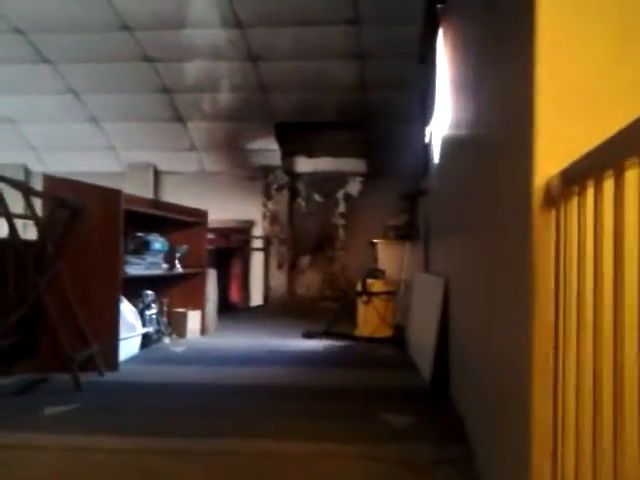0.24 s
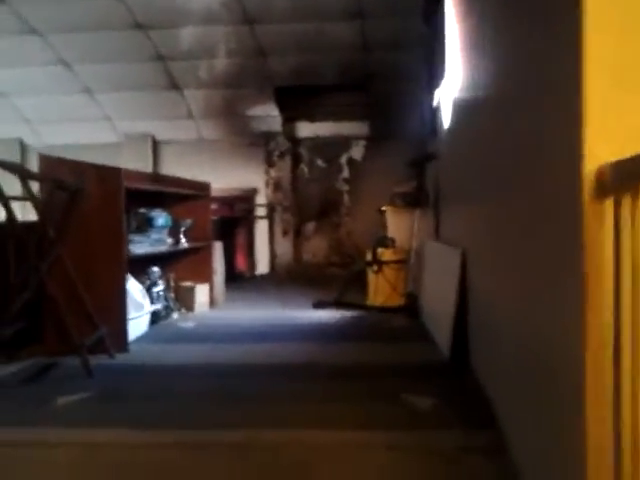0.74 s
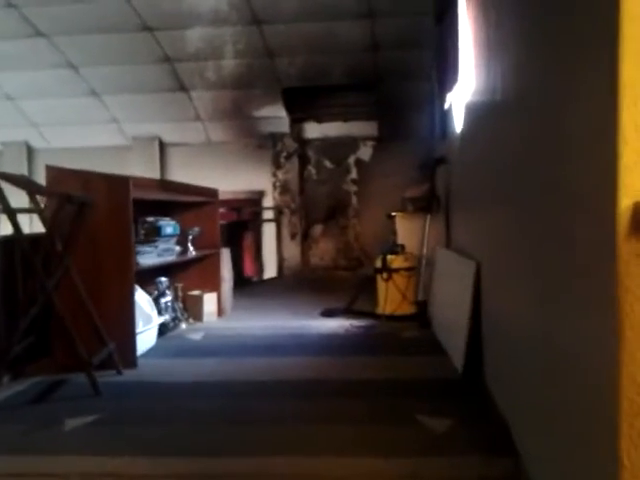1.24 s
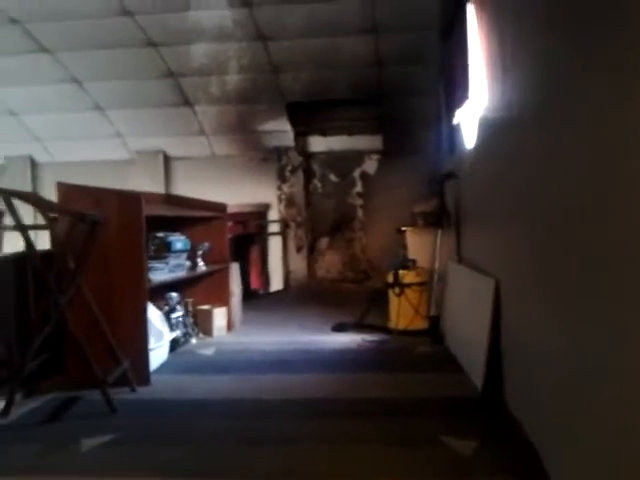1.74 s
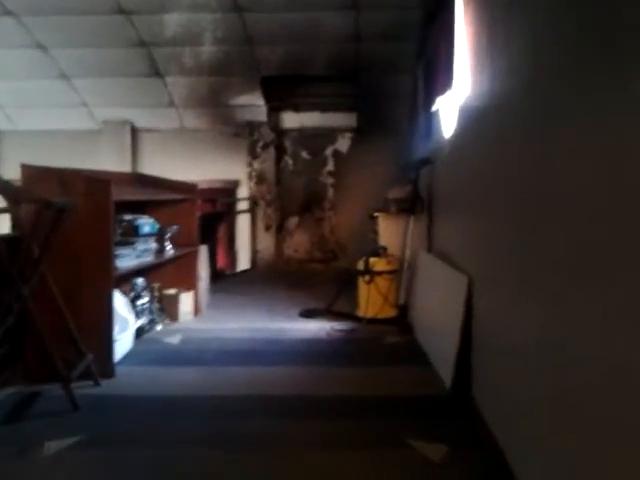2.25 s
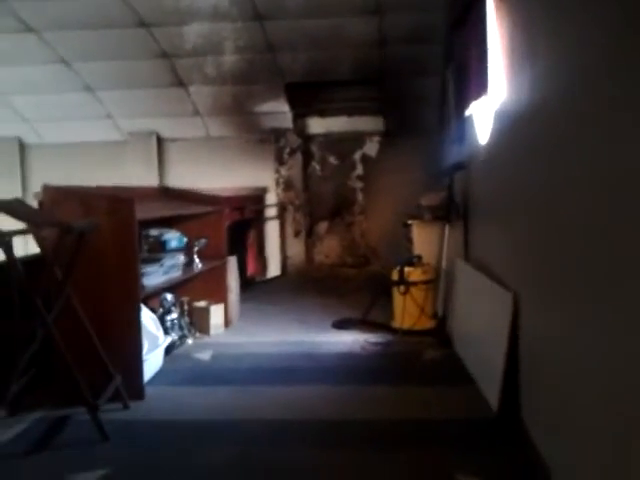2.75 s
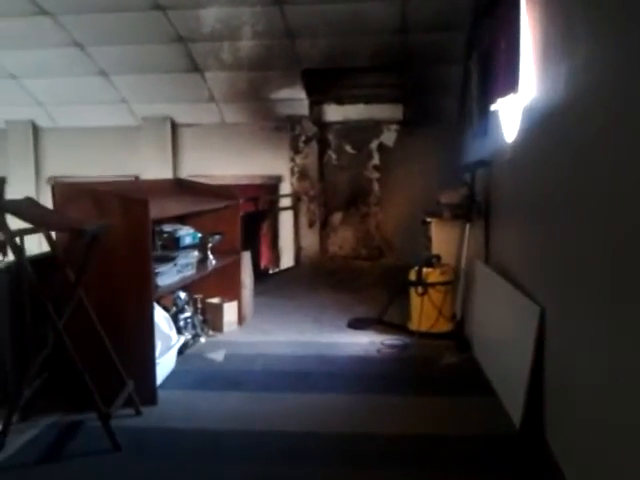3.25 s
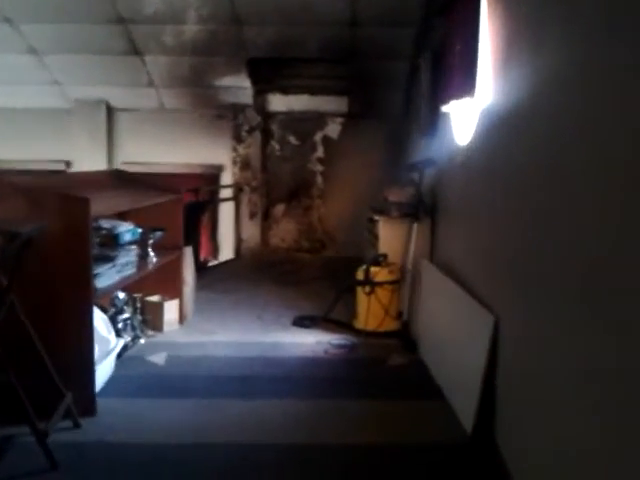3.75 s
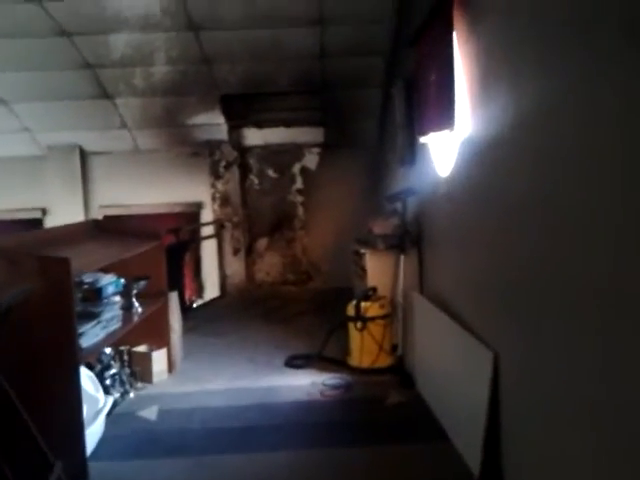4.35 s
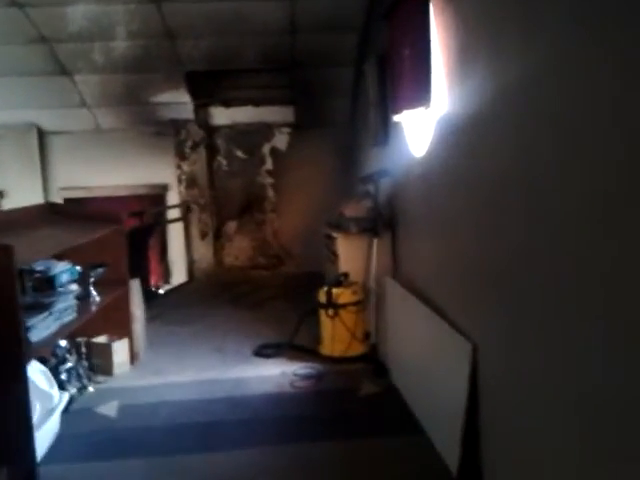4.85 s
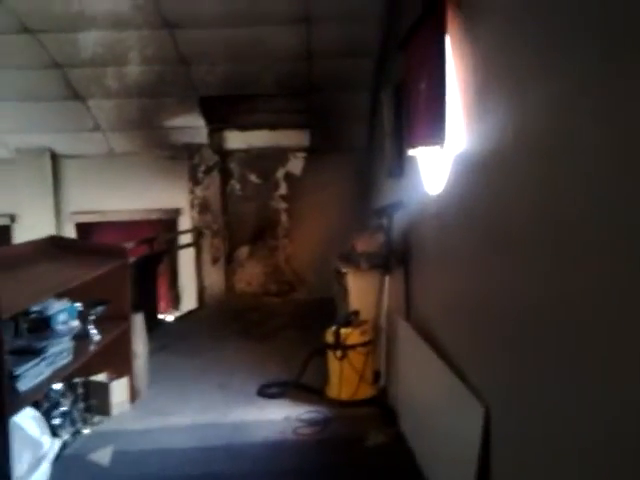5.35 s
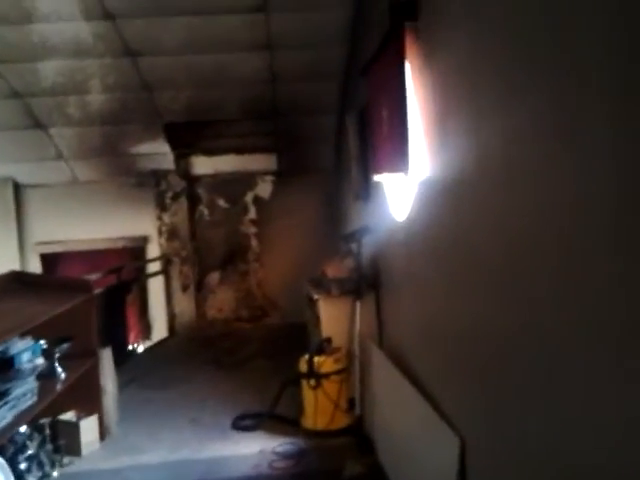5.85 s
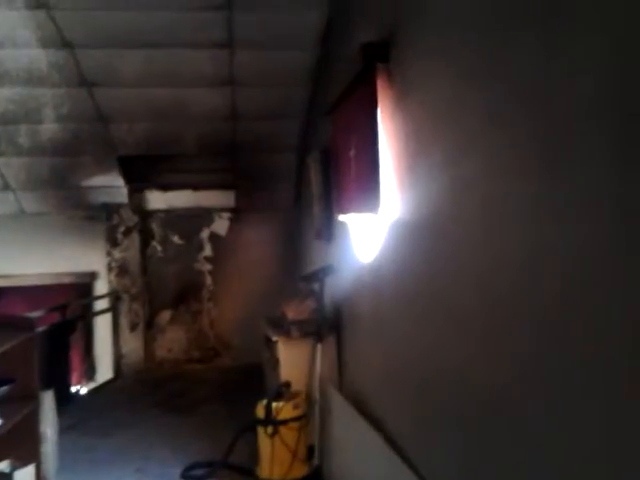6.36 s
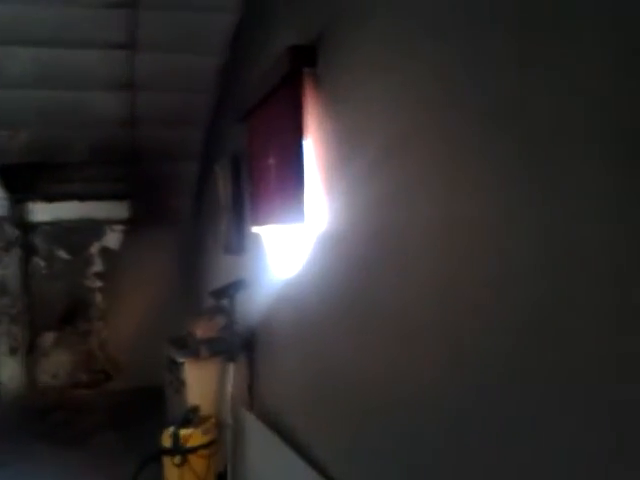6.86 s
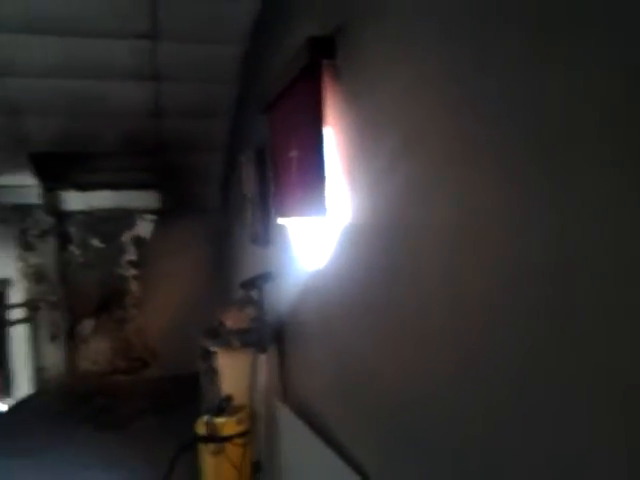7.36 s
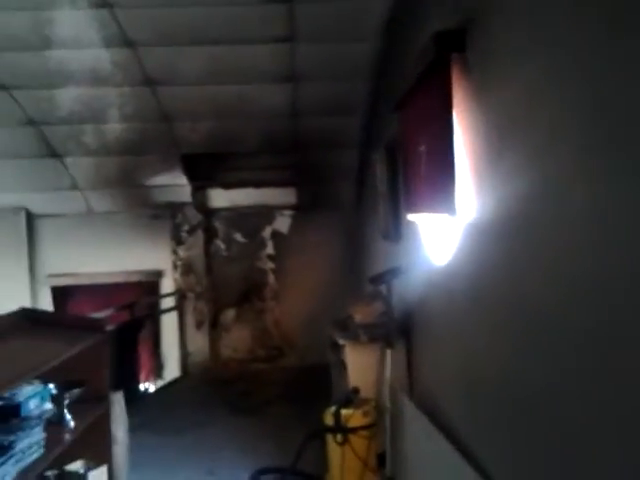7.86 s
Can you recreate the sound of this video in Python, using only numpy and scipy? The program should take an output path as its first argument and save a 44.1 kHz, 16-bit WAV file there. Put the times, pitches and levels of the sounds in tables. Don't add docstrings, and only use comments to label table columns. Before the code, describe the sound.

Close, bass-light hand-held pickup of a person walking slowly through an echoing, fire-damaged interior. Six spaced heavy steps thud on loose boards, with lighter knocks, crunching grit and dusty sprays between them. A small metallic rattle follows the second step and boards creak very faintly. A barely audible motor hums before the final, strongest step; afterwards only ringing decay, hiss, tiny irregular ticks and a few clicks remain.

```python
import sys
import numpy as np
from scipy import signal
from scipy.fft import rfft, irfft
from scipy.io import wavfile
from scipy.ndimage import uniform_filter1d

SR = 44100
rng = np.random.default_rng(int(sys.argv[2]) if len(sys.argv) > 2 else 0)


def generate_wav(signal):
    frames = np.transpose(np.atleast_2d(signal))
    scaled = np.clip(frames, -1, 1) * 32767
    pcm = np.round(scaled).astype(np.int16)
    wavfile.write(sys.argv[1], SR, pcm)


def volts_from_db(level):
    exponent = np.asarray(level, float) / 20
    return 10 ** exponent


N = 357634

# start_s, level_db, sharpness_db, weight_db, brightness_db
BLOWS = [(0.331, -31.5, 21, 3.5, -1.5), (0.585, -47, 27.5, -12, 15), (1.535, -38.5, 0, -3.5, -23.5),
         (2.469, -32, 15, 0.5, -12), (2.488, -40, 17, 0, -2), (2.703, -44.5, 23, -12, 10),
         (2.746, -38.5, 15, -19, -22), (3.431, -29.5, 15.5, -3, -9.5), (3.461, -32, 3, -9.5, -13),
         (3.505, -35, 15.5, -4, -10.5), (3.71, -46, 5, -15, -12), (3.826, -38.5, 15, -5, 4.5),
         (3.855, -35.5, 19.5, -5, 5.5), (3.874, -33.5, 20, -26, 8), (4.394, -27.5, 15, -4, 5.5),
         (4.413, -21.5, 17, 1, 1.5), (4.99, -49, 20, -3, 15), (5.6667, -16, 15, 2, -15),
         (5.691, -17, 15, -3, -14)]
# start_s, level_db, sharpness_db, weight_db, brightness_db
RAPS = [
    (0.285, -22.5, -1, -9, -22.5),
    (0.612, -43.5, 17, -13, -1),
    (1.844, -45, -5, -21, 1.5),
    (4.975, -47, 24, -19.5, 8),
    (5.627, -30.5, -3.5, 0, -8),
]
SNAP_SHARE, SOLID_SNAP_DB, HOLLOW_SNAP_DB = 0.46, -2, -12.5
# low_hz, high_hz
BANDS = [
    (250, 900),
    (900, 3200),
    (3200, 6500),
    (6500, 15000),
]
# pitch_hz, level_db per Hz
MIC = [(100, -60), (230, -32.5), (330, -5), (430, -11.5), (700, -4.5), (1500, -8), (2200, -4.5),
       (3400, -14.5), (5000, -18), (7000, -13), (8500, -4), (10000, -14), (12500, -26), (15800, -30)]
# pitch_hz, t60_s
ROOM = [(150, 0.95), (400, 1), (1000, 0.96), (2700, 0.84), (5000, 0.64), (8500, 0.6), (14000, 0.19)]
# pitch_hz, fill_s
BUILD = [(200, 0.056), (700, 0.035), (2500, 0.012), (9000, 0.0083)]

# start_s, level_db, t60_s, swell_s
HEELS = [
    (.33, -34, 0.83, 0.011),
    (1.533, -47, 0.92, 0.0077),
    (2.47, -39.5, 0.74, 0.0038),
    (3.435, -37.5, 0.73, 0.028),
    (4.41, -26.5, 0.84, 0.053),
    (5.67, -21.5, 0.81, 0.0061),
]
# start_s, level_db, t60_s, swell_s
TOES = [
    (.286, -33, 0.69, 0.007),
    (5.626, -45, 0.37, .004),
]
# pitch_hz, width_hz, level_db
PANEL_A = [(340, 10, -7), (447, 27, -4), (624, 30, 1), (660, 20, -2), (872, 30, -7), (1217, 30, -5),
           (1572, 57, -9), (1787, 20, -9), (1915, 39, -9)]
PANEL_B = [(334, 21, -9), (483, 12, 0), (712, 20, -8), (760, 10, -9), (834, 58, -5), (1298, 30, -5),
           (1500, 29, -9)]
PANEL_C = [(322, 3, -1), (458, 41, -2), (576, 20, -7), (716, 30, 0), (834, 20, -6), (985, 40, -6),
           (1437, 50, -6), (1720, 56, -5), (2040, 41, -6)]
PANEL_D = [(428, 15, -3), (568, 10, -1), (616, 15, -2), (958, 36, -6), (1111, 40, -5), (1396, 40, -7),
           (1563, 20, -7), (1725, 29, -8), (2080, 60, -4)]
PANEL_E = [(420, 6, -2), (469, 8, -4), (575, 28, -3), (727, 20, -3), (792, 20, -3), (950, 59, -3),
           (1012, 20, -5), (1160, 26, -4), (1583, 60, -7), (1830, 42, -8), (2056, 32, -6)]
PANEL_F = [(268, 8, -11), (420, 6, 0), (451, 10, -4), (494, 10, -3), (592, 12, -2), (836, 20, -5),
           (942, 15, -5), (1100, 6, -9), (1850, 49, -9), (2062, 50, -6), (2116, 30, -7), (2342, 30, -6),
           (2560, 60, -8), (2750, 36, -10)]
# pitch_hz, width_hz, level_db
PANEL_TOE = [(460, 20, -9), (775, 30, -8), (969, 15, -5), (1464, 40, -12), (1782, 15, 0), (2213, 30, -3),
             (2676, 40, -10), (2821, 40, -12)]
SPLIT_HZ, SIDE_SHARE = 3, .28
# start_s, level_db, pitch_hz, t60_s
JOISTS = [(.335, -40, 207.5, .6), (.34, -47, 262, .7), (.345, -34, 635, .5), (.7, -70, 215, 2.5),
          (1.54, -59, 230, .55), (2.47, -49, 201, .43), (2.47, -62, 146.5, .68), (2.5, -46, 322, .7),
          (3.44, -55, 196.6, .9), (3.485, -36, 600, .8), (3.86, -54, 382, 1.1), (4.48, -56, 159.5, 1.4),
          (4.5, -38, 420, .8), (4.64, -64, 12020, 1.2), (5.67, -49, 135, .61), (5.68, -28, 592, .45),
          (5.69, -45, 197.5, .9), (5.71, -28, 1100, .7), (5.75, -35, 835, .45), (5.79, -36, 497, .7),
          (5.9, -61, 267, 3.5), (6.19, -54, 497, .5), (6.3, -61, 330, 1.4), (6.5, -62, 195, 1.5),
          (7.04, -68, 358, 2.1)]

# start_s,
# length_s, low_db, high_db
SCUFFS = [(0, .1, -57, -66), (1.2, 0.2, -61.5, -60.5), (1.41, 0.38, -64.5, -78), (1.7, 0.064, -56, -62),
          (1.85, 0.047, -65, -58), (2.16, 0.18, -91, -60.5), (2.32, 0.075, -83, -55.5),
          (2.71, 0.055, -71, -42.5), (2.76, 0.065, -58, -53), (2.98, 0.059, -58, -54),
          (3.86, 0.16, -52.5, -45.5), (6.35, 0.13, -62, -57), (7.19, 0.082, -69, -59.5),
          (7.04, 0.035, -63, -79), (6.55, 0.42, -66, -80)]
# start_s, level_db, pitch_hz, ring_cycles
PIPS = [(.586, -24, 6000, 8.7), (.586, -33, 2250, 4.5), (.613, -29, 8800, 12), (.337, -24, 1150, 5),
        (.338, -23, 2350, 9), (3.511, -29, 2600, 9), (3.535, -28, 1500, 2.5), (3.737, -41, 1900, 3.5),
        (1.844, -39, 1900, 5), (1.854, -38, 8500, 14), (1.859, -38, 9100, 44), (1.953, -41, 7000, 4.5),
        (2.168, -52, 6370, 37), (2.704, -30, 2100, 5.5), (2.747, -28, 1850, 7), (2.777, -36, 2400, 3.5),
        (2.473, -26, 1700, 5), (2.49, -25, 2000, 4), (2.48, -29, 1550, 14), (4.399, -22, 7000, 6),
        (4.419, -17, 2300, 5), (3.4318, -22, 8200, 10), (3.826, -29, 5500, 9), (3.8555, -22, 8800, 9),
        (3.8555, -27, 3000, 4), (3.8742, -19, 8300, 8), (3.8742, -26, 2200, 3), (4.836, -44, 7200, 36),
        (4.975, -37, 2500, 5), (4.975, -36, 5400, 7), (5.638, -37, 4900, 18), (5.6465, -42, 4900, 17),
        (5.667, -11, 2400, 5), (6.752, -48, 1560, 2.7), (7.636, -45, 8500, 14.8), (7.723, -49, 7500, 4),
        (7.083, -52, 8600, 14)]
# start_s, level_db, length_s
DUST = [(.592, -32, .029), (1.912, -42, .025), (2.003, -41, .017), (2.712, -44, .04), (3.775, -52, .016),
        (4.396, -25, .085), (4.98, -52, .035), (5.668, -35, .1)]
# start_s, level_db
JINGLES = [(1.903, -45), (1.913, -38), (1.93, -46), (1.951, -52), (2.001, -42), (3.7615, -53),
           (3.7748, -42), (3.7944, -49)]
# pitch_hz, width_hz, level_db
METAL = [(6130, 250, -7.5), (7460, 160, -8), (8500, 184, 1), (8900, 104, 1), (10700, 80, 0),
         (12000, 100, -21), (13300, 80, -12), (14400, 120, -20)]
# start_s, length_s, level_db, pitch_hz
CREAKS = [
    (1.415, 0.13, -58.5, 2280),
    (2.985, .06, -62, 2170),
    (6.6, 0.306, -72.5, 2220),
]

# start_s, level_db
CLICKS = [(7.153, -48), (7.553, -51.5), (7.723, -49), (6.904, -53), (6.254, -37)]
TICKS = [.19, .804, .953, 1.243, 1.343, 1.663, 1.793, 2.129, 2.613, 3.223, 3.283, 3.343, 3.643, 4.113,
         4.243, 4.643, 4.863, 5.093, 5.273, 5.393, 5.493, 5.923, 6.043, 6.163, 6.253, 6.663, 6.903, 7.153,
         7.553, 7.723]
SOFT_TICKS = [1.058, 1.385, 2.303, 2.363, 2.619, 2.659, 4.31, 4.687, 4.945, 5.1, 5.139, 5.292, 5.352, 5.463,
              5.525, 5.586, 6.39, 6.42, 6.818, 7.012, 7.035, 7.338, 7.51, 7.848]
CLOCK_S, CLOCK_START_S, FAINT_CHANCE = .01, .0033, .09
TICK_DB, TICK_SPREAD_DB, SOFT_TICK_DB, FAINT_TICK_DB = -44.5, 1.3, -48, -52
# pitch_hz, level_db
TICK_COLOUR = [(500, -26.5), (5000, -24), (11000, -7.0), (15500, -4.0), (17000, -50.0)]

# start_s, pitch_hz, level_db
HUM = [
    (4.55, 199, -54),
    (4.63, 205, -56.5),
    (5.06, 207.7, -66.5),
    (5.45, 210, -71),
    (5.6, 203, -77),
]
# pitch_hz, level_db per Hz
HISS = [(30, -23), (100, -7.5), (300, 2.5), (1000, -14.5), (2500, -10.5), (5000, -11.5), (7200, -10),
        (8600, -2.5), (10000, -9), (12500, -8.5), (15800, -7)]
# start_s, level_db
HISS_DB = [
    (0, -59.5),
    (4.3, -59.5),
    (5.6, -60.5),
    (6.2, -62),
    (8.11, -63),
]
# pitch_hz, level_db per Hz
STIR = [(150, -14.5), (400, -5.5), (1200, -5.0), (2200, -5.5), (3500, -13.0), (6500, -12.0),
        (8500, 1.0), (10200, -10.5), (16000, -24)]
STIR_DB, STIR_LATE_DB, STIR_UNDER_HEEL_DB, STIR_T60_S, STIR_SWELL_S = -58, -64.5, -36.5, 2.2, 0.089
# pitch_hz, level_db per Hz
RUMBLE = [(30, -22), (60, -18.0), (100, -3.0), (200, -9.0), (500, -32.0), (2000, -63.0)]
RUMBLE_DB, RUMBLE_UNDER_HEEL_DB, RUMBLE_T60_S, RUMBLE_SWELL_S = -88, -40.5, .9, .02
# centre_s, width_s, level_db
GUSTS = [(2.14, 0.34, -90), (3.389, 0.063, -72), (4.4, 0.18, -68), (6.8, 0.35, -73.5), (7.152, 0.16, -73),
         (7.58, 0.3, -69.5)]
SETTLE_S, SETTLE_WIDTH_S = 5.85, .15
LATE_DULL_DB, DULL_HZ = -6, 6000


def evened(x):
    return x / np.sqrt(np.mean(x ** 2) + 1e-20)


def read(points, hz):
    f, value = np.transpose(points)
    return np.interp(np.log(hz + 1), np.log(f + 1), value)


def add(mix, s, sound):
    part = mix[round(s * SR):][:len(sound)]
    part += sound[:len(part)]


def causal(gain_db):
    log_gain = np.log(volts_from_db(np.r_[gain_db, gain_db[-2:0:-1]]))
    return np.fft.ifft(np.exp(log_gain - 1j * signal.hilbert(log_gain).imag)).real


def tinted(hz, levels_db):
    base = read(MIC, hz)
    bend = []
    for (low, high), level_db in zip(BANDS, levels_db):
        inside = (hz >= low) & (hz < high)
        held_db = 10 * np.log10(np.sum(volts_from_db(2 * base[inside])) / len(hz))
        bend.append((np.sqrt(low * high), level_db - held_db))
    return base + read(bend, hz)


def blow(db, sharp_db, weight_db, bright_db, snap_db):
    crack_db = db + sharp_db
    tail_db = db + np.array([weight_db, 0, snap_db + SNAP_SHARE * bright_db, bright_db])
    size = round(1.3 * SR)
    seconds = np.arange(size) / SR
    fine_hz = np.fft.rfftfreq(size, 1 / SR)
    modes_db = evened(uniform_filter1d(rng.standard_normal(len(fine_hz)), size=8))
    modes_db = 5.7 * modes_db / (1 + fine_hz / 1500)
    taps = irfft(rfft(rng.standard_normal(size)) * volts_from_db(modes_db - modes_db.std()), size)
    taps *= volts_from_db(4.31 * np.minimum(rng.exponential(1, size), 4) * np.exp(-seconds / 0.067))
    hz, t, z = signal.stft(taps, SR, nperseg=256)
    fill = 0.26 + 0.75 * (1 - np.exp(-t / read(BUILD, hz)[:, None]))
    fall_db = -60 * t / read(ROOM, hz)[:, None]
    decay = 0.66 * volts_from_db(fall_db) + 0.17 * volts_from_db(6.9 * fall_db)
    colour = volts_from_db(tinted(hz, tail_db) - 5.0)[:, None]
    tail = signal.istft(z * fill * decay * colour, SR, nperseg=256)[1][:size]
    tail *= np.minimum(seconds / 0.0011, 1)
    crack_colour_db = tinted(np.fft.rfftfreq(1024, 1 / SR), np.add(tail_db, [-6.5, 2.0, -4.5, 0.5]))
    burst = rng.standard_normal(200) * volts_from_db(-60 * np.arange(200) / SR / 0.016)
    crack = np.convolve(causal(crack_colour_db)[:512], burst)
    add(tail, 0, volts_from_db(crack_db - 6.0) * crack / abs(crack).max())
    return signal.sosfilt(signal.butter(4, 365, "high", fs=SR, output="sos"), tail)


def panel(db, t60, swell, modes):
    t = np.arange(round(1.5 * SR)) / SR
    ring = np.zeros(len(t))
    for hz, width, mode_db in modes:
        fall = volts_from_db(mode_db - 60 * t / t60 * (hz / 500) ** 0.15)
        rise = 1 - np.exp(-t / swell * (hz / 500))
        below = -SPLIT_HZ - width * rng.random()
        above = SPLIT_HZ + width * rng.random()
        for offset, share in [(0, 1), (below, SIDE_SHARE), (above, SIDE_SHARE)]:
            ring += share * fall * rise * np.sin(2 * np.pi * ((hz + offset) * t + rng.random()))
    return volts_from_db(db) * ring


def joist(db, hz, t60):
    t = np.arange(round(1.5 * SR)) / SR
    waver = 1 + .45 * np.sin(2 * np.pi * rng.uniform(4.4, 9) * t)
    return volts_from_db(db - 60 * t / t60) * np.sin(2 * np.pi * hz * t) * (1 - np.exp(-t / 0.029)) * waver


def scuff(length, low_db, high_db):
    size = round(.6 * SR)
    t = np.arange(size) / SR / length
    grit = evened(rng.standard_normal(size) * volts_from_db(2.3 * rng.exponential(1, size)))
    colour_db = tinted(np.fft.rfftfreq(size, 1 / SR), [low_db - 7.0, low_db, high_db - 9.5, high_db])
    stroke = 3 * t * np.exp(1 - 3 * t)
    return irfft(rfft(grit) * volts_from_db(colour_db), size) * stroke


def pip(db, hz, cycles):
    t = np.arange(round(cycles / hz * SR)) / SR
    return volts_from_db(db) * np.hanning(len(t)) * np.sin(2 * np.pi * hz * t)


def dust(db, length):
    t = np.arange(round(.4 * SR)) / SR / length
    treble = signal.butter(2, 10500, "high", fs=SR, output="sos")
    spray = signal.sosfilt(treble, rng.standard_normal(len(t)))
    return volts_from_db(db) * spray * np.minimum(t * 11.0, 1) * np.exp(-2.3 * t)


def jingle(db):
    t = np.arange(round(.2 * SR)) / SR
    ring = np.zeros(len(t))
    for hz, width, mode_db in METAL:
        for offset in (0, width * rng.uniform(-0.91, 1)):
            fall = volts_from_db(mode_db + 1.4 * rng.standard_normal() - 60 * t / 0.15)
            ring += fall * np.sin(2 * np.pi * ((hz + offset) * t + rng.random()))
    puff = scuff(0.018, -11.5, 0)[:len(t)] + 0.39 * scuff(0.11, -21.0, 0)[:len(t)]
    return volts_from_db(db) * (0.39 * ring * np.minimum(t / 0.0039, 1) + .5 * puff)


def creak(length, db, hz):
    size = round(length * SR)
    band = signal.butter(2, [hz * .88, hz * 1.14], "band", fs=SR, output="sos")
    rub = evened(signal.sosfilt(band, rng.standard_normal(16384)))[:size]
    return volts_from_db(db) * rub * signal.windows.tukey(size, .5)


def click(db):
    return volts_from_db(db) * np.array([.4, -1, .5, .1])


def tick(db):
    sound = causal(read(TICK_COLOUR, np.fft.rfftfreq(512, 1 / SR)))[:200]
    return volts_from_db(db - .8) * rng.choice([-1, 1]) * sound / abs(sound).max()


def ticks():
    clear = [(s, TICK_DB + TICK_SPREAD_DB * rng.standard_normal()) for s in TICKS]
    soft = [(s, SOFT_TICK_DB) for s in SOFT_TICKS]
    faint = []
    for s in np.arange(CLOCK_START_S, N / SR, CLOCK_S):
        if rng.random() < FAINT_CHANCE:
            faint.append((s, FAINT_TICK_DB + 4.0 * (rng.random() - .5)))
    return faint + soft + clear


def hum():
    s, hz, db = np.transpose(HUM)
    t = np.arange(s[0], s[-1], 1 / SR)
    tone = np.sqrt(2) * np.sin(2 * np.pi * np.cumsum(np.interp(t, s, hz)) / SR)
    return s[0], volts_from_db(np.interp(t, s, db)) * tone * signal.windows.tukey(len(t), .2)


def after_heels(t, under_db, t60, swell):
    start, level_db = np.array(HEELS)[:, :2].T[:, :, None]
    age = np.maximum(t - start, 0)
    return np.sum(volts_from_db(level_db + under_db - 60 * age / t60) * (1 - np.exp(-age / swell)), axis=0)


def background():
    frames, hz = N // 256 + 5, np.fft.rfftfreq(1024, 1 / SR)
    t = np.arange(frames) * 256 / SR
    settled = .5 + .5 * np.tanh((t - SETTLE_S) / SETTLE_WIDTH_S)
    hiss = volts_from_db(np.interp(t, *np.transpose(HISS_DB)))
    stir = volts_from_db(STIR_DB + (STIR_LATE_DB - STIR_DB) * settled)
    stir = stir + after_heels(t, STIR_UNDER_HEEL_DB, STIR_T60_S, STIR_SWELL_S)
    rumble = volts_from_db(RUMBLE_DB) + after_heels(t, RUMBLE_UNDER_HEEL_DB, RUMBLE_T60_S, RUMBLE_SWELL_S)
    for s, width, db in GUSTS:
        rumble = rumble + volts_from_db(db) * np.exp(-((t - s) / width) ** 2)
    dull_db = LATE_DULL_DB * settled * (hz[:, None] > DULL_HZ)
    layers = [(HISS, hiss, .5, 0), (STIR, stir, 1.5, dull_db), (RUMBLE, rumble, 1.2, 0)]
    out = np.zeros(N)
    for colour, gain, patchy_db, late_db in layers:
        a, b, patches = rng.standard_normal((frames, 513, 3)).T
        patches = evened(uniform_filter1d(uniform_filter1d(patches, 12, 0), 14, 1))
        z = (a + 1j * b) * volts_from_db(read(colour, hz)[:, None] + patchy_db * patches + late_db)
        noise = signal.istft(z, nperseg=1024, noverlap=768)[1][:N]
        out += np.interp(np.arange(N) / SR, t, gain) * evened(noise)
    return out


def scene():
    mix = background()
    solid = [(*row, SOLID_SNAP_DB) for row in BLOWS]
    hollow = [(*row, HOLLOW_SNAP_DB) for row in RAPS]
    sources = [(solid + hollow, blow), (JOISTS, joist), (SCUFFS, scuff), (PIPS, pip), (DUST, dust),
               (JINGLES, jingle), (CREAKS, creak), (CLICKS, click), (ticks(), tick)]
    for table, source in sources:
        for s, *row in table:
            add(mix, s, source(*row))
    for (s, *row), modes in zip(HEELS, [PANEL_A, PANEL_B, PANEL_C, PANEL_D, PANEL_E, PANEL_F]):
        add(mix, s, panel(*row, modes))
    for s, *row in TOES:
        add(mix, s, panel(*row, PANEL_TOE))
    add(mix, *hum())
    return mix[None]


def top_cut(x):
    return signal.sosfilt(signal.butter(12, 16630, fs=SR, output="sos"), x)


def record(dry):
    thin = signal.sosfilt(signal.butter(1, 90, "high", fs=SR, output="sos"), dry)
    edge = signal.firwin(511, 15850, window=("kaiser", 9), fs=SR)
    mix = signal.oaconvolve(thin, edge[None], "same")
    return top_cut(mix)


dry = scene()
out = record(dry)
generate_wav(out)
```